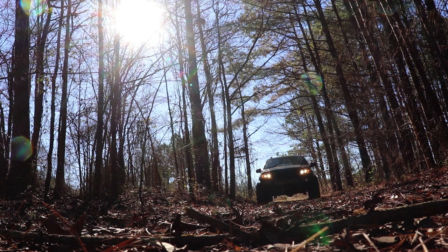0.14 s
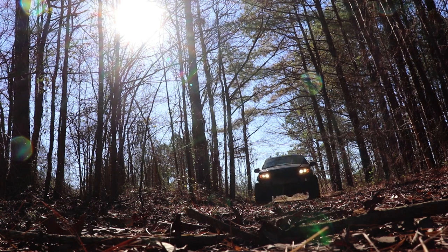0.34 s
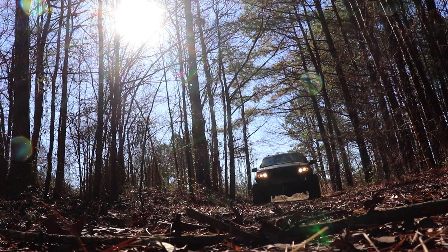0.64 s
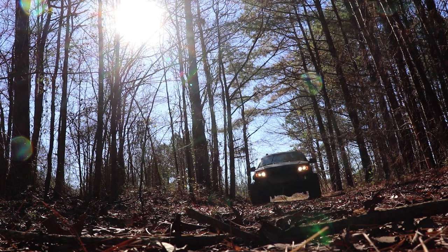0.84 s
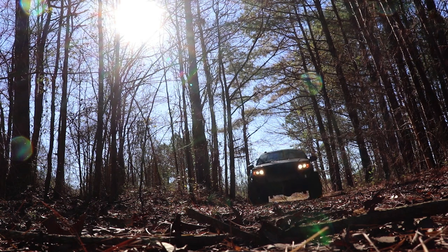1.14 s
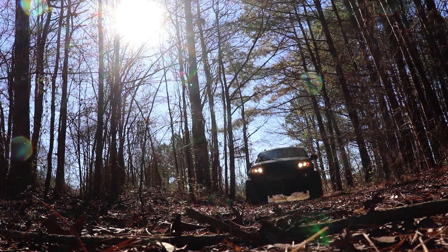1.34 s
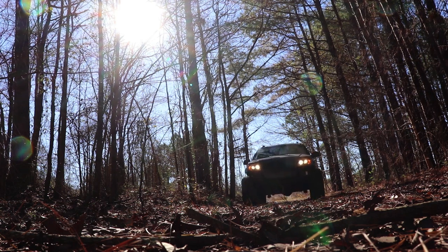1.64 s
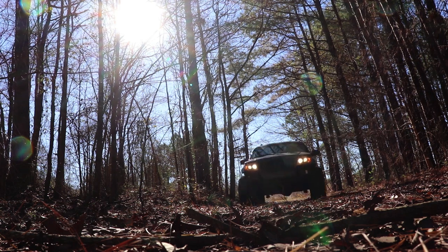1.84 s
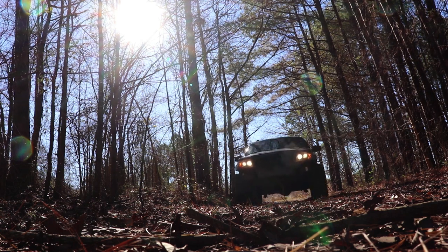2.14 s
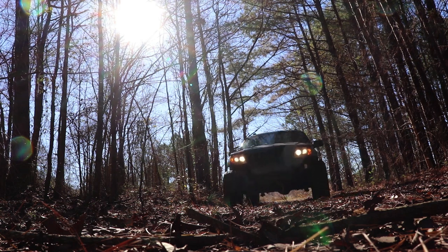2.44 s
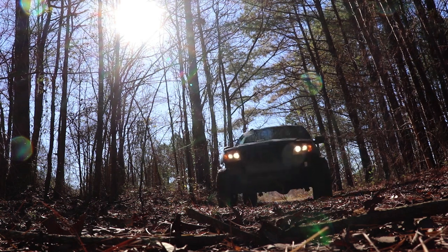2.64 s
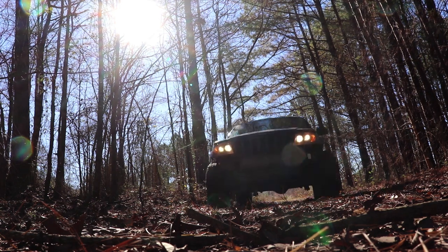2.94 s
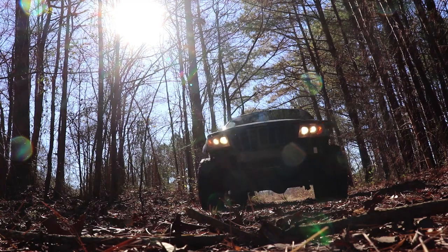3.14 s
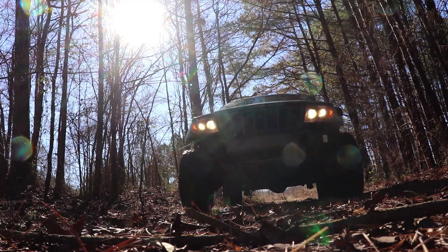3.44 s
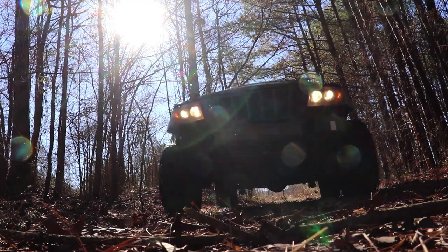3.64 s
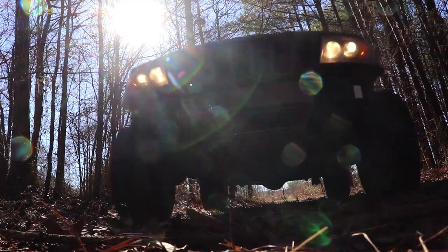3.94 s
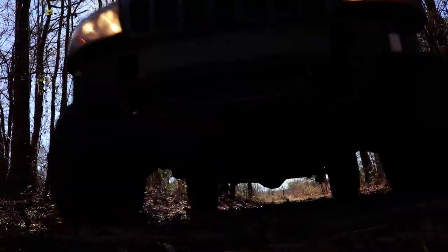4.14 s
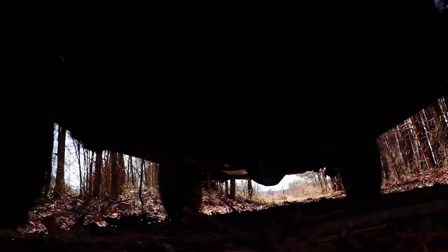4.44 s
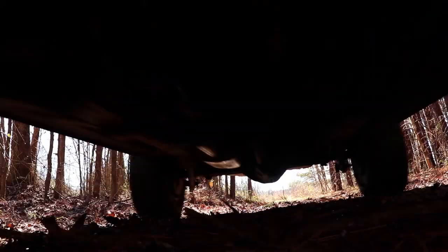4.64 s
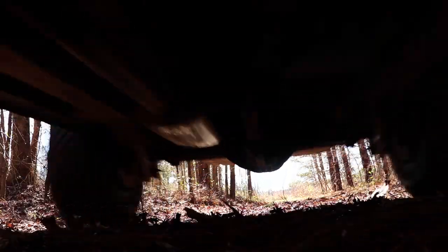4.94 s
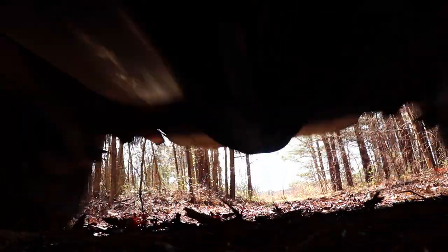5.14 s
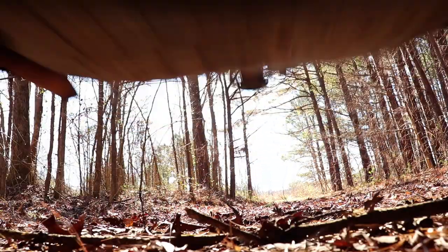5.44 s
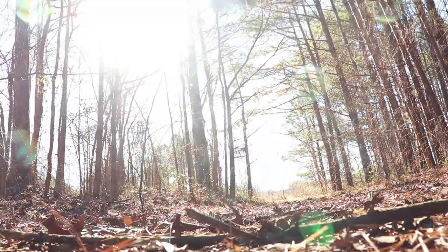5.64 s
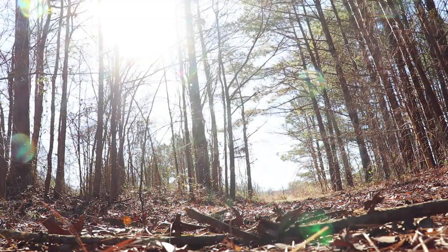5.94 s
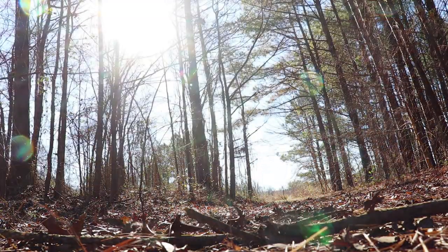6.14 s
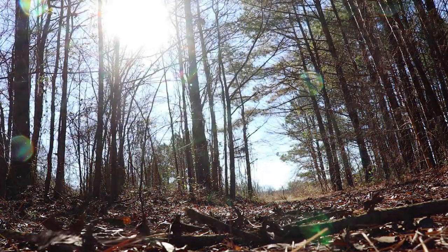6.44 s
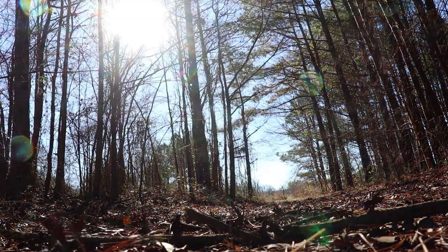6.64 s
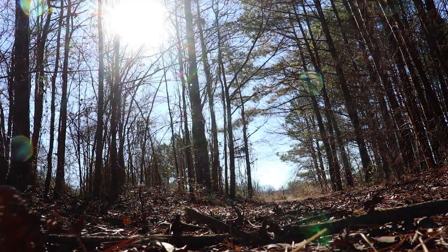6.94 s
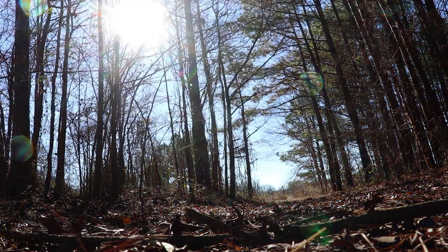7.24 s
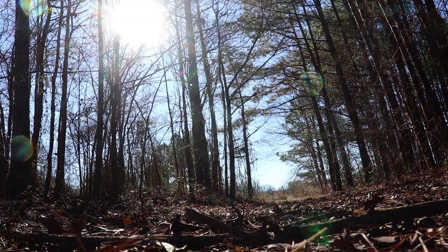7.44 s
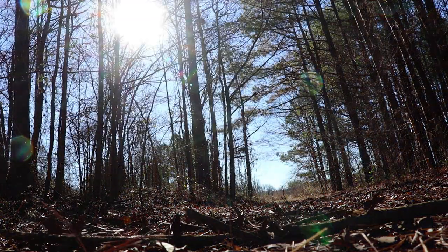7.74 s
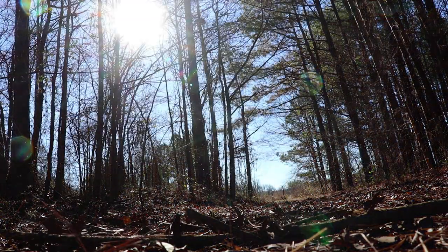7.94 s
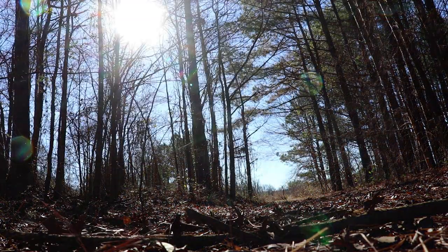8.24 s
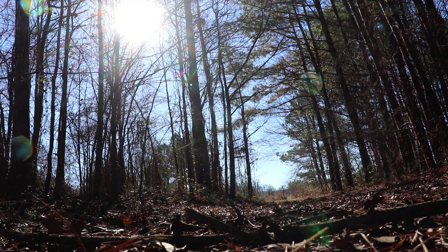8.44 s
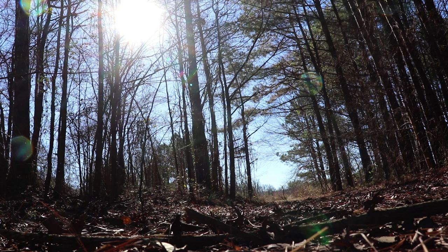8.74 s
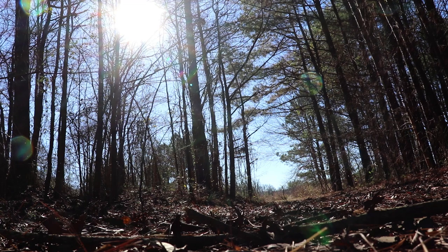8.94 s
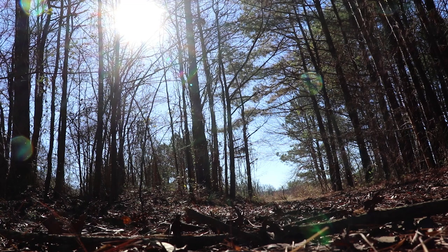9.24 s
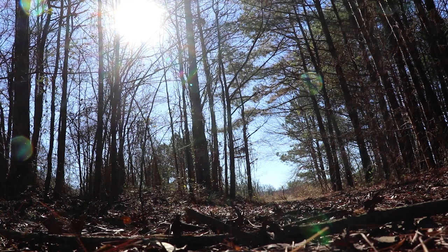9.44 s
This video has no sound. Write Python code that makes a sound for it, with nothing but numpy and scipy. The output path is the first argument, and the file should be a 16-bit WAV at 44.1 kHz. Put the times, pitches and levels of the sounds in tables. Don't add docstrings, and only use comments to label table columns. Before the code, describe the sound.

On a woodland trail, a four-wheel-drive with a deep eight-cylinder engine idles ahead, then gulps throttle and approaches with a low growl and fan hum. Leaf crackle grows, a twig cracks sharply, and tyres crunch loudly around a stereo microphone on the ground as the vehicle passes overhead. The exhaust then burbles from behind, fading back towards idle with a few last leaf ticks.

```python
import sys
import numpy as np
from scipy import signal
from scipy.io import wavfile
from scipy.ndimage import uniform_filter1d

SR = 44100
rng = np.random.default_rng(int(sys.argv[2]) if len(sys.argv) > 2 else 0)


def invert_db(level):
    return 10 ** (np.asarray(level, dtype=float) / 20)


def inscribe(sig):
    pcm = np.round(np.clip(np.atleast_2d(sig).T, -1, 1) * 32767)
    wavfile.write(sys.argv[1], SR, pcm.astype(np.int16))


N = 423360
T = np.arange(N) / SR

# t/s, blend (-1 ahead, 0 overhead, 1 behind), lag of
VIEW_BLEND = [(0, -0.29, 3.5), (.9, -0.38, 0.5), (1.4, -0.55, 1.5), (3.7, -0.7, -1), (4.4, 0.056, -1),
              (5.2, 0.18, -5), (5.75, 0.46, -6.5), (5.9, 0.63, -5), (7.2, 0.96, -2.5), (7.6, 0.95, 2.5),
              (9.6, 0.52, 3.5)]
# t/s, level/dB
ENGINE_LEVEL = [(0, -34.5), (.7, -33), (1.0, -26), (1.6, -23), (2.1, -23.5), (2.8, -22.5), (4.3, -23.5),
                (4.7, -28), (5.0, -33), (5.2, -30), (5.7, -35), (6.2, -36.5), (6.6, -33.5), (7.5, -31.5),
                (8.1, -32), (8.7, -35), (9.0, -38.5), (9.6, -38.5)]


def evened(x):
    return x / np.sqrt(np.mean(x ** 2) + 1e-20)


def smooth(x, samples):
    return uniform_filter1d(uniform_filter1d(x, samples), samples)


def spectrum(points, hz):
    f, value = np.transpose(points)
    return np.interp(np.log(hz + 1), np.log(f + 1), value)


def curve(rows, t):
    s, *columns = np.transpose(rows)
    return [np.interp(t, s, c) for c in columns]


def ramp(start_s, length_s):
    return np.clip((T - start_s) / length_s, 0, 1)


def swell(peak_s, peak_db, rise_db_per_s, fall_db_per_s):
    return peak_db - np.where(T < peak_s, rise_db_per_s, fall_db_per_s) * abs(T - peak_s)


def follow(pivot_db, share):
    return pivot_db + share * (curve(ENGINE_LEVEL, T)[0] + 33.5)


def panned(db, pan_db):
    return invert_db(db + np.outer([.5, -.5], pan_db))


def resonate(x, hz, width):
    r = np.exp(-np.pi * width / SR)
    return 2 * signal.lfilter([1 - r], [1, -r * np.exp(2j * np.pi * hz / SR)], x).real


def air(magnitude, size, lo, hi):
    # f/Hz, correlation
    same_ahead = [(60, 0.99), (180, 1.0), (550, 1), (1650, 0.89), (4970, 1), (15000, 0.36)]
    same_past = [(60, 1), (180, 1.0), (550, 0.96), (1650, 0.87), (4970, 0.19), (15000, 0.089)]
    # f/Hz,
    # level/dB
    lean_ahead = [(500, 0.1), (2000, -1), (4500, -0.3), (13000, -1.4)]
    lean_past = [(500, -0.5), (2000, 4), (4500, -0.7), (9000, 5), (13000, 7)]
    frames = N * 2 // size + 3
    hz = np.fft.rfftfreq(size, 1 / SR)[:, None]
    t = np.arange(frames) * size / 2 / SR
    a, b, c, d, patches = rng.standard_normal((frames, len(hz), 5)).T
    patches = evened(uniform_filter1d(uniform_filter1d(patches, 8, 0), 6, 1))
    place, lag = curve(VIEW_BLEND, t)
    past = np.clip(place + 1, 0, 1)
    same = (1 - past) * spectrum(same_ahead, hz) + past * spectrum(same_past, hz)
    same = np.clip(same, -1, 1)
    lean = invert_db(.5 * ((4 - past) * spectrum(lean_ahead, hz) + past * spectrum(lean_past, hz)))
    left = a + 1j * b
    right = np.exp(2j * np.pi * hz * lag / SR) * same * left
    right = right + np.sqrt(1 - same ** 2) * (c + 1j * d)
    shape = magnitude(hz, t)
    inside = (hz > lo) & (hz < hi)
    shape = shape / np.sqrt((inside * shape ** 2).sum(0)) * invert_db(0.95 * patches)
    z = np.array([left * lean, right / lean]) * shape
    return signal.istft(z, window="cosine", nperseg=size, noverlap=size // 2)[1][:, :N] * 0.53


def rumble():
    # f/Hz, level/dB
    ground = [(12, -66), (20, -37), (37, -15.5), (70, -12), (118, 2.5), (160, -12.5), (210, -39),
              (350, -120)]
    return invert_db(-27.5) * air(lambda hz, t: invert_db(spectrum(ground, hz) + 0 * t), 4096, 20, 200)


def leaves():
    # t/s, level/dB
    crackle_level = [(0, -46), (.7, -46), (1.45, -39), (2.5, -37.5), (3.3, -35), (3.8, -33.5), (4.45, -31),
                     (4.7, -29), (4.93, -36), (5.06, -37), (5.3, -34), (5.62, -34), (5.77, -39),
                     (5.83, -46), (6.05, -45.5), (6.3, -50), (7.7, -47.5), (9.6, -55)]
    # f/Hz, level/dB
    colour_ahead = [(710, -19), (1200, -10), (1370, -40), (1520, -1.5), (1680, -39), (2130, -12.5),
                    (2580, -16), (4380, -6.5), (9420, -13.5), (12900, -21), (15100, -27), (15800, -33)]
    colour_overhead = [(530, -32), (900, -3), (1310, -1), (1760, -3.5), (1940, -3), (3750, -6), (4380, -6),
                       (6060, -9.5), (8370, -9.5), (13500, -17.5), (15800, -23)]
    colour_behind = [(880, -26), (1500, -6.5), (1720, -11.5), (2660, -14), (4020, -11), (5560, -10.5),
                     (8750, -10.5), (12200, -16), (15000, -24), (15800, -29)]

    def shape(hz, t):
        place = np.clip(curve(VIEW_BLEND, t)[0], -1, 1)
        db = np.maximum(-place, 0) * spectrum(colour_ahead, hz)
        db = db + np.maximum(place, 0) * spectrum(colour_behind, hz)
        db = db + (1 - abs(place)) * spectrum(colour_overhead, hz)
        tilt = np.interp(t, (1.6, 3.6), [3, -1])
        return invert_db(db + tilt * np.log2(hz / 5000 + 0.12))

    cracks = invert_db(2.7 * np.minimum(rng.exponential(1, N), 5)) * (rng.random(N) < 400 / SR)
    decay = np.exp(-1 / (0.0013 * SR))
    grain = np.sqrt(1 + 0.061 * signal.lfilter([1], [1, -decay], cracks ** 2))
    clumps = invert_db(1.07 * evened(uniform_filter1d(rng.standard_normal(N), 1800)))
    return air(shape, 512, 3030, 7040) * evened(grain * clumps) * invert_db(curve(crackle_level, T)[0] + 2.5)


def crushes():
    # t/s, peak level/dB, left minus right/dB
    handfuls = [(1.55, -30, 0), (2.77, -19, 0), (3.2, -29, 8), (3.58, -28, 0), (3.9111, -24, -2.0),
                (4.06, -20, -1.0), (4.2463, -16, -1), (4.393, -11.5, 2.5), (4.507, -11, 2.5),
                (4.5721, -34, 0.5), (4.6524, -13, -2), (4.757, -17, 0.5), (4.851, -13.5, 1.0),
                (4.885, -23, 1.0), (4.99, -32, 1.5), (5.12, -18, 1.5), (5.262, -14.5, 1.5),
                (5.3473, -21, 5), (5.4077, -17, 1.0), (5.454, -14.5, 3), (5.518, -19, 6), (5.626, -21, 8),
                (5.759, -18.5, 5), (5.916, -28, 12), (5.9869, -28, 6), (6.091, -25, 6), (6.54, -32, 2),
                (7.165, -28, 4), (7.32, -30, 1), (7.6, -49, 37)]
    out, t = np.zeros((2, N + 4000)), np.arange(4000) / SR
    bright = signal.butter(1, [3000, 8500], "band", fs=SR, output="sos")
    envelope = np.exp(-t / .024) * (1 - np.exp(-t / .012)) * 1.3
    for s, db, pan_db in handfuls:
        burst = evened(signal.sosfilt(bright, rng.standard_normal((2, 4000)))) * envelope
        out[:, round((s - .008) * SR):][:, :4000] += panned(db, pan_db) * burst / 3
    return out[:, :N]


def twigs():
    # t/s, peak level/dB, f/Hz, left minus right/dB
    snaps = [(1.534, -22, 2920, -2), (2.27, -40, 3000, -1), (3.93, -6.5, 1265, -8), (4.51, -23, 3100, .5),
             (4.644, -17, 1600, -7), (4.663, -13, 3000, 0), (4.68, -14, 2000, -13), (4.702, -19, 2600, -4),
             (1.15, -26, 1500, 0), (5.771, -32, 4970, 12), (5.94, -38, 4630, 11), (5.949, -39, 3100, 2),
             (5.99, -33, 3660, -1), (6.075, -34, 3200, 5), (6.1, -30, 3040, 3), (6.549, -40, 2000, 2),
             (7.175, -30, 4400, -6), (7.234, -43, 5100, 3), (7.738, -46, 2700, 1.5)]
    # peak level/dB, width/Hz
    snap_width = [(-34, 400), (-28, 1400), (-12, 2300)]
    out, t = np.zeros((2, N + 2000)), np.arange(2000) / SR
    for s, db, hz, pan_db in snaps:
        width = curve(snap_width, db)[0]
        burst = rng.standard_normal(2000) * np.exp(-t / 0.004)
        snap = resonate(resonate(burst, hz, width), hz, width)
        out[:, round(s * SR):][:, :2000] += panned(db - 5.0, pan_db) * snap / abs(snap).max()
    return out[:, :N]


def roar(cycles):
    # f/Hz, level/dB
    coming = [(120, -39), (220, 5.5), (330, 1.5), (470, -4), (730, -3.5), (870, -9.5), (1240, -12),
              (2200, -22), (3000, -51)]
    leaving = [(120, -26), (200, -4), (290, -5), (380, -2.5), (500, -4), (860, -16.5), (1240, -18.5),
               (2200, -39.5), (3000, -55)]

    def shape(hz, t):
        going = np.clip(curve(VIEW_BLEND, t)[0] * .5 + .5, 0, 1)
        return invert_db((1 - going) * spectrum(coming, hz) + going * spectrum(leaving, hz))

    puffs = 1 + .15 * np.cos(16 * np.pi * cycles)
    puffs += .17 * ramp(5, 1) * np.cos(2 * np.pi * (cycles - .2))
    lumps = invert_db(1.12 * evened(uniform_filter1d(rng.standard_normal(N), 2500)))
    return air(shape, 2048, 492.6, 1480) * puffs * lumps * invert_db(curve(ENGINE_LEVEL, T)[0] - 0.2)


def crank():
    # t/s, firing rate/Hz
    firing_rate = [(0.0, 48.03), (0.5, 48.43), (0.7, 53.35), (1.05, 74.33), (1.4, 88.3), (1.65, 90.4),
                   (2.15, 83.98), (2.55, 82.85), (3.45, 86.77), (3.7, 85.41), (4.5, 75.35), (5.2, 63.19),
                   (5.45, 60.68), (6.15, 58.66), (6.8, 59.35), (8.55, 54.66), (9.0, 47.25), (9.6, 47.35)]
    speed = curve(firing_rate, T)[0]
    return np.cumsum(speed) / 8 / SR, np.clip((55.5 - speed) / 5, 0, 1)


def firings(cycles, places, strength, delay_ms, rough, jitter_ms):
    at = np.arange(int(cycles[-1]) + 1)[:, None] + places
    chance = rng.standard_normal(at.shape + (2,))
    s = np.interp(at, cycles, T, 0, 99) + (delay_ms + jitter_ms * chance[..., 0]) / 1000
    x = np.zeros(N + 1)
    np.add.at(x, np.clip((s * SR).astype(int), 0, N), strength * (1 + rough * chance[..., 1]))
    return x[:N] / np.gradient(cycles)


def duct(x, modes, level_db, low_hz, high_hz):
    y = sum(np.sign(sign) * invert_db(db) * resonate(x, hz, w) for hz, w, db, sign in modes)
    y = signal.sosfilt(signal.butter(3, [low_hz, high_hz], "band", fs=SR, output="sos"), y)
    return y / np.sqrt(smooth(y ** 2, 9000) + 1e-9) * invert_db(level_db)


def fan(turn):
    waver = invert_db(.7 * evened(smooth(rng.standard_normal(N), 3000)))
    tone = np.cos(3.47 * turn) + 0.64 * np.cos(3 * turn) + 0.38 * np.cos(2 * turn)
    heard = ramp(0.53, .4) * (1 - ramp(4.49, 0.423))
    return np.sqrt(2) * invert_db(follow(-35.5, 1.25)) * heard * waver * tone


def pipe_hum(turn):
    overtones = [(11, -28), (12, -40), (13, -44), (14, -38), (15, -32), (16, -37.5), (17, -42)]
    hum = sum(invert_db(db) * np.cos(k * turn / 4 + 2 * np.pi * rng.random()) for k, db in overtones)
    lift_db = np.maximum(swell(4.5, 0, 40, 26) + 7, 0)
    return np.sqrt(2) * hum * invert_db(follow(1.66, 0.76) + lift_db) * ramp(4.72, 1.0)


def firing_tone(turn, idle):
    thump_db = np.where(T > 5.05, -30.5 + 6 * (T - 9), -44.5)
    thump = np.sqrt(2) * invert_db(thump_db) * idle * (np.cos(turn) + 1.1 * np.cos(3 * turn))
    return thump - np.sqrt(2) * invert_db(swell(5.5, -34, 14, 61)) * np.cos(2 * turn)


def intake(cycles):
    # strength, extra delay/ms
    cylinders = [(.78, .54), (.37, -.94), (1.36, -.16), (.82, 2.01), (1.06, -.22), (.54, -.94), (1.36, .55),
                 (.58, -.77)]
    # f/Hz, width/Hz, level/dB, sign
    modes = [(101.6, 34.4, -31, -1), (139.3, 14.9, -18.5, 1), (187, 25, -52, -1), (265.3, 35, -39, 1),
             (426, 63, -47, -1)]
    idle_db, gulp_db, cruise_db = -32.5, 4, -17
    open_s, opening_s, settle_s = 0.74, 0.094, 0.33
    places = np.arange(8) / 8 + 0.0512
    clicks = firings(cycles, places, *np.transpose(cylinders), rough=0.12, jitter_ms=0.35)
    gulp = gulp_db * np.exp(-np.maximum(T - open_s - 3 * opening_s, 0) / settle_s)
    opened = 1 - np.exp(-np.maximum(T - open_s, 0) / (.5 * opening_s))
    level_db = idle_db + opened * (cruise_db + gulp - idle_db)
    level_db += 15 * np.clip(T - 4.35, 0, .8)
    return duct(clicks, modes, level_db, 82, 293) * np.sqrt(np.clip((5.25 - T) / 1.26, 0, 1))


def tailpipe(cycles, idle, behind):
    # strength, extra delay/ms
    cylinders = [(1.38, 2.83), (.81, .94), (.7, -4.43), (1.14, 3.25), (.74, 1.74), (1.02, 1.59),
                 (.78, -1.37), (1.02, -4.55)]
    # f/Hz, width/Hz, level/dB, sign
    loaded_modes = [(56.5, 14.7, -40.4, 1), (97.8, 12, -22.9, 1), (122.1, 31.6, -27, -1),
                    (148.8, 13.3, -35.2, 1), (276, 83, -48, -1)]
    idle_modes = [(129, 9.8, 1.5, 1), (248, 54, -9, 1)]
    level_db = -12.5 - 4 * np.maximum(T - 7.55, 0) - 3.5 * idle
    places = np.arange(8) / 8 - .098
    clicks = firings(cycles, places, *np.transpose(cylinders), rough=.04, jitter_ms=.05)
    loaded = duct(clicks, loaded_modes, level_db, 40, 300) * np.sqrt(behind * (1 - idle))
    unloaded = resonate(duct(clicks, idle_modes, level_db + 3.0, 104, 340), 121, 72)
    return loaded + unloaded * np.sqrt(behind * idle)


def silencer_bark(cycles, idle, behind):
    barks = [(.105, 0), (.68, -8)]
    # t/s, level/dB
    bark_level = [
        (5.05, -29),
        (5.4, -24),
        (5.72, -31),
        (5.9, -36),
        (6.45, -28),
        (7.2, -24),
        (7.7, -26),
        (8.2, -30.5),
        (8.75, -30.5),
    ]
    bark_hz = 336
    places, db = np.transpose(barks)
    later = cycles - .1 * ramp(7.9, .6)
    clicks = resonate(firings(later, places, invert_db(db), 0, rough=0.08, jitter_ms=0.1), bark_hz, 45)
    bark = duct(clicks, [(bark_hz, 34, 0, 1), (490, 11, 2, -1)], curve(bark_level, T)[0] + 1, 283, 485)
    bark *= np.sqrt(behind) * (1 - 0.7 * ramp(8.85, 0.13))
    clicks = firings(cycles, places + 0.32, invert_db(0.31 * db), 0, rough=.15, jitter_ms=0.1)
    ring = duct(clicks, [(499, 10, 0, 1)], follow(-41, .6), 450, 503) * ramp(5.4, 0.58) * (1 - idle)
    clicks = firings(later, places[:1] + 0.0296, 1, 0, rough=.1, jitter_ms=0.11)
    pop = duct(clicks, [(244, 33, 1, 1), (406, 47, -3.7, -1)], swell(8, -26.5, 11, 15), 240, 630)
    return bark + ring + pop


def engine(cycles, idle):
    behind = ramp(5.05, .4)
    turn = 16 * np.pi * cycles
    ducts = intake(cycles) + tailpipe(cycles, idle, behind) + silencer_bark(cycles, idle, behind)
    return ducts + firing_tone(turn, idle) + pipe_hum(turn) + fan(turn)


def scene():
    cycles, idle = crank()
    low = engine(cycles, idle)
    late = np.roll(low, 4)
    echo = signal.hilbert(low).imag
    wide = invert_db(-22) * ramp(4.7, 1.0) * echo
    ports = np.array([low * invert_db(-2.17) + wide, late * invert_db(-2.4) - wide])
    return ports + rumble() + leaves() + crushes() + twigs() + roar(cycles)


def roll_off(x):
    return signal.sosfilt(signal.butter(12, 15960, fs=SR, output="sos"), x)


def record(dry):
    limited = 1.287 * np.tanh(dry / 1.093)
    edge = signal.firwin(511, 15820, window=("kaiser", 9), fs=SR)
    return roll_off(signal.oaconvolve(limited, edge[None], "same"))


dry = scene()
out = record(dry)
inscribe(out)
```